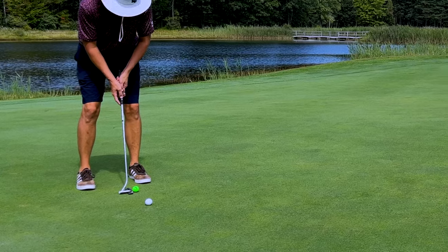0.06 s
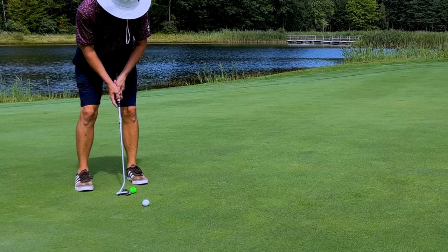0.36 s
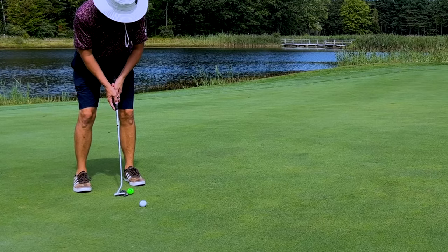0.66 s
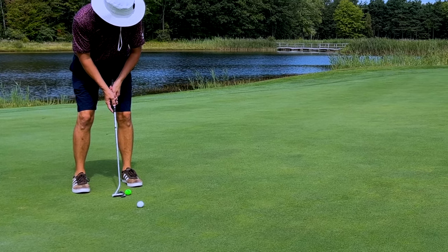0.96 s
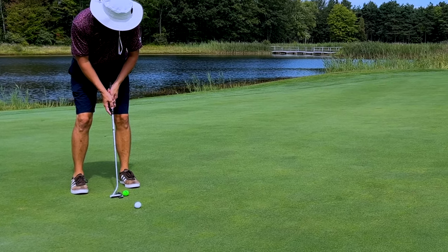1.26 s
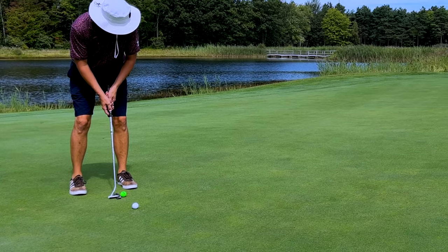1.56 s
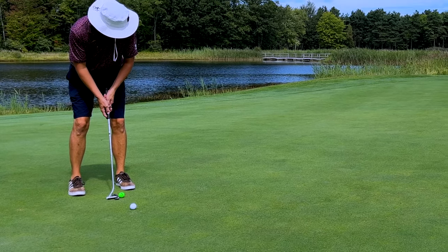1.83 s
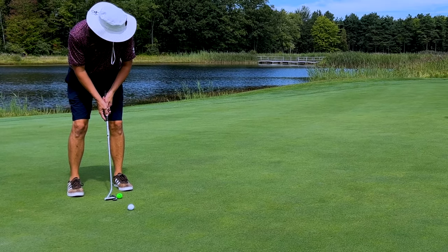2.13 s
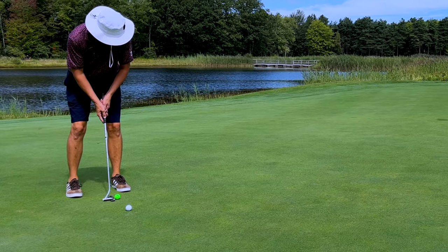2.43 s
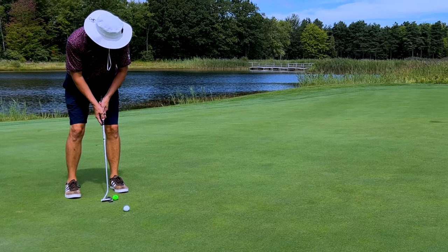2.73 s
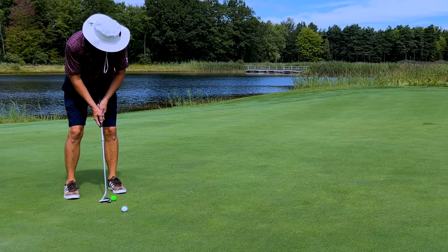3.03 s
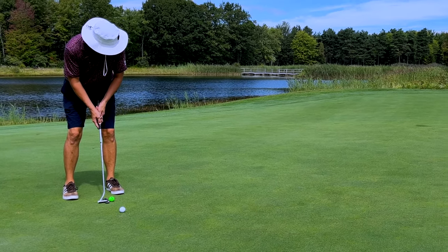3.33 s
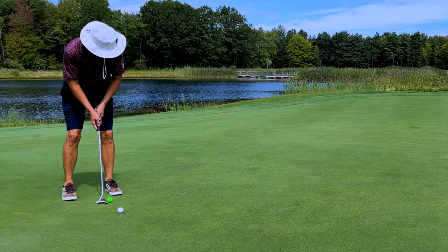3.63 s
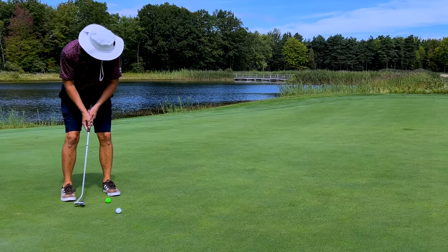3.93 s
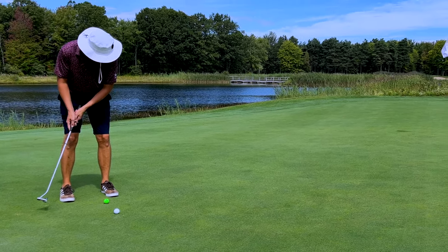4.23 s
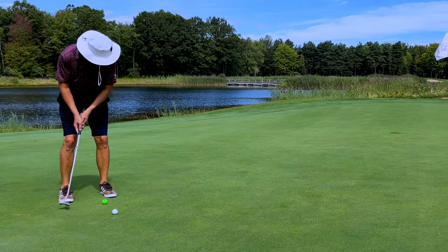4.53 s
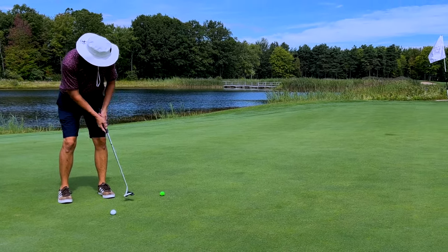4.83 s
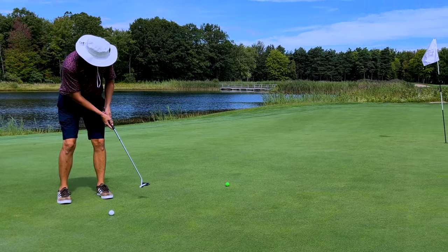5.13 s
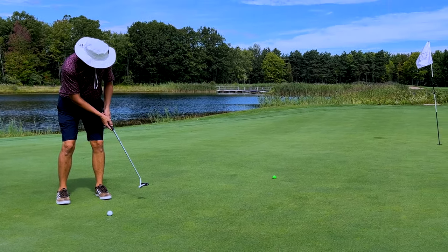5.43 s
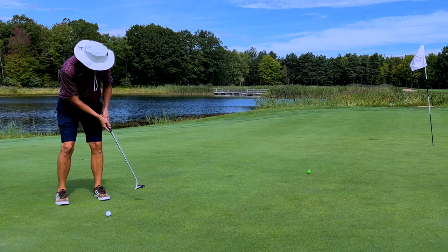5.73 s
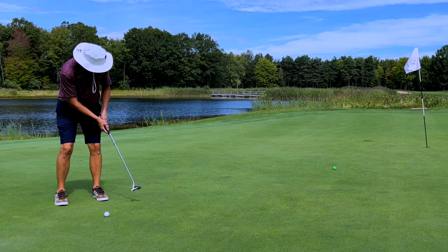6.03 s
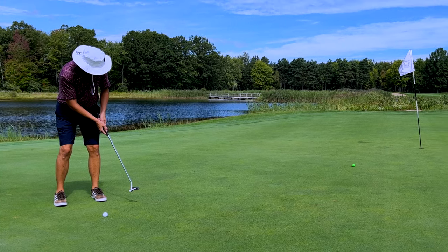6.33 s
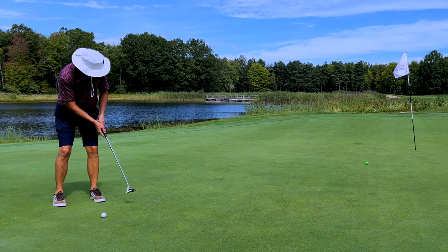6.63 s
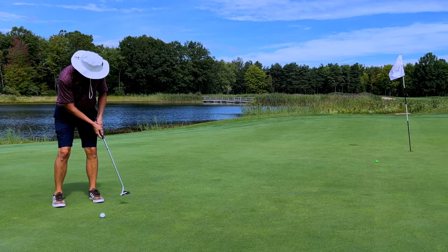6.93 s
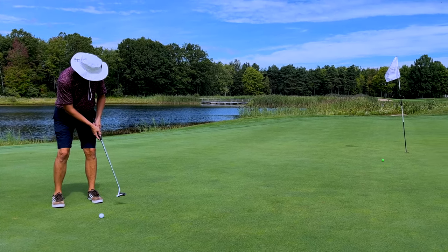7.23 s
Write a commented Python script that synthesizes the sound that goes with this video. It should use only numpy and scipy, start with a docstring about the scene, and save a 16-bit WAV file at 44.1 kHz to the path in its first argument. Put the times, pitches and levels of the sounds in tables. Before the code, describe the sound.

A steady low rumble lies under the whole scene on an outdoor golf green, with a light rustle of leaves and a faint high hiss of meadow insects. Crickets chirp in quick triple pulses about every 0.4 seconds, growing louder between 5 and 6.5 seconds. A cicada holds a thin, high buzz that slowly swells, then stops at about 6 seconds with one short extra buzz. A distant mower hums throughout, a little stronger from 3.5 to 6.5 seconds. A woodpecker drums a short, hollow roll at around 1.8 seconds, and a far bird repeats one soft note six times between 2.8 and 4 seconds. At 4.7 seconds the putter strikes the ball with a single sharp click and a very brief metallic ring, slightly to the left. A second, somewhat louder woodpecker roll follows from 4.9 to 5.3 seconds. The background continues to the end, just past 7 seconds.

```python
"""Putt on a summer green

One sharp click: the putter rings head and ball. A cicada buzzes its tymbals and stops; crickets
scrape their wings in threes over a chorus of meadow insects. A woodpecker drums twice on a hollow
trunk and a bird calls softly in the woods. A far mower hums over leaves and a low rumble.
Two closely spaced microphone ports pick it all up."""
import sys
import numpy as np
from scipy import signal
from scipy.fft import rfft, irfft
from scipy.io import wavfile

SR = 44100
rng = np.random.default_rng(int(sys.argv[2]) if len(sys.argv) > 2 else 0)


def materialize(psi):
    """Save the field psi as 16-bit PCM at rate SR to the path in sys.argv[1].

    A 1-D psi becomes a single channel; in a 2-D psi each row is a channel.
    """
    bounded = np.clip(np.atleast_2d(psi).T, -1, 1)
    quanta = np.round(bounded * 32767).astype(np.int16)
    wavfile.write(sys.argv[1], SR, quanta)


N = 320414
T = np.arange(N) / SR
FREQS = np.maximum(np.arange(N // 2 + 1) * SR / N, 1)
PUTT_S = 4.7017


def putt(level_db=-24.5, turf_ms=1.148, turf_db=-9, tick_ms=2.51, tick_db=-13):
    """A very short contact rings head and ball; the turf reflects it and a fainter tick follows."""
    # head and ball modes: (frequency [Hz], relative level [dB], t60 [s], left-right [dB])
    modes = [(463, 1.5, 0.011, 4), (930, -4.5, 0.009, 15), (1350, 1, 0.011, 10), (1770, -7, .008, 3),
             (2450, -7, 0.0031, 4), (3410, -7, 0.011, 11), (3760, -20.5, 0.13, 13), (4870, -10, 0.009, 11),
             (9300, -22, 0.0056, 5), (11000, -25, .005, -5), (13100, -23, .005, -3)]
    clicks = np.zeros(N)
    for delay_ms, db in [(0, 0), (turf_ms, turf_db), (tick_ms, tick_db)]:
        clicks[round((PUTT_S + delay_ms / 1000) * SR)] += from_db(db)
    rings = np.zeros((2, N))
    for k, (hz, db, t60_s, left_db) in enumerate(modes):
        mode = (-1) ** k * from_db(db) * ring(clicks, hz, t60_s)
        rings += pan(ports(mode, lag_ms=.278), left_db)
    return from_db(level_db) * (rings + from_db(-12) * scatter(rings, t60_s=.1))


def high_hiss(centre_hz=12200, width_hz=1300, level_db=-72, t60_s=.3):
    """A faint, very high hiss dies away just after the click."""
    since_s = np.maximum(T - PUTT_S, 0)
    decay = from_db(level_db - 60 * since_s / t60_s) * (since_s > 0)
    return ports(decay * noise(bell(FREQS - centre_hz, width_hz)), lag_ms=.16)


def crickets(top_hz=5470, min_fall_hz=640, syllable_s=.026, lead_s=.012, gain_db=4.5, grit_db=2.2):
    """Each wing closure is a gritty syllable that holds its pitch, then drops as the scraper slows."""
    # chirps, near and far: (time of first syllable [s], relative level [dB])
    chirps = [(.153, -63), (.26, -65), (.555, -62), (.694, -60.5), (1.09, -59.5), (1.131, -63), (1.51, -64),
              (1.537, -58), (1.913, -60.5), (2.352, -62), (2.742, -63.5), (3.158, -62), (3.566, -64),
              (4.004, -62.5), (4.394, -59), (4.812, -57), (5.265, -55), (5.674, -53), (6.096, -54.5),
              (6.513, -56)]
    # three wing closures per chirp: (delay [s], relative level [dB])
    syllables = [(0, -1), (.042, 0), (.087, 0.4)]
    out, u = np.zeros(N), np.linspace(0, 1, int(syllable_s * SR))
    swell = np.sin(np.pi * u ** 1.26)
    for s, db in chirps:
        for delay_s, syllable_db in syllables:
            hz = top_hz + rng.normal(0, 25) - min_fall_hz * rng.uniform(1, 1.4) * u ** 3
            gain = from_db(db + syllable_db + rng.normal(0, 1))
            start = int((s + delay_s - lead_s) * SR)
            out[start:start + len(u)] += gain * swell * np.sin(phase_of(hz))
    out *= from_db(gain_db + grit_db * drift(90))
    direct = pan(ports(out, lag_ms=.039), left_db=6.5)
    return direct + from_db(-9) * scatter(direct, t60_s=.36)


def cicada(width_hz=275, low_tone_hz=6170, end_s=6.03, release_db_per_s=299, last_buzz_s=6.135):
    """Two tymbals click in turn into the resonant abdomen; the song ends with one short extra buzz."""
    # song: (time [s], level [dB], abdomen resonance [Hz])
    song = [(0.05, -71.5, 6700), (0.3, -66.5, 6720), (0.7, -65.5, 6880), (1.1, -67.5, 6780),
            (1.55, -66.5, 6780), (1.95, -60.5, 6870), (2.45, -64.5, 6720), (2.7, -62, 6840),
            (3.4, -60, 6770), (4.0, -62, 6670), (4.5, -60, 6710), (5.0, -58.5, 6620), (5.2, -57, 6690),
            (5.45, -61, 6680), (5.75, -65, 6660), (5.98, -65, 6760)]
    # tymbal click rate, one hitch, slowing as the insect tires: (time [s], rate [Hz])
    tymbal_rate = [(1.6, 168.05), (2.15, 168.2), (2.19, 168.8), (2.6, 168), (3.4, 168.15), (5.55, 168),
                   (5.8, 167.6), (6.06, 166), (6.12, 163.8)]
    # second tymbal's lag behind the half cycle as the body flexes: (time [s], lag [s])
    tymbal_lag = [(2.1, 36e-6), (2.3, 48e-6), (3.0, 44e-6), (3.5, 35e-6), (4.0, 38e-6), (4.4, 48e-6),
                  (5.0, 48e-6), (5.2, 36e-6), (5.7, 37e-6), (5.95, 50e-6)]
    # thin tone below the resonance: (time [s], level [dB])
    low_tone = [(0.1, -82), (0.7, -73), (1.0, -75), (1.3, -65), (1.6, -69), (2.0, -78), (3.6, -72.5),
                (4.7, -73), (5.2, -69), (5.9, -68)]
    # weaker lines either side of the resonance: (frequency [Hz], level [dB])
    side_lines = [(5000, -88), (5370, -76), (5540, -70.5), (5720, -85.5), (5880, -78.5), (6040, -79.5),
                  (6210, -76.5), (6400, -82.5), (7200, -81), (7400, -67.5), (7560, -80), (7750, -82),
                  (8240, -87.5), (8800, -99), (9300, -90), (9750, -88.5), (10100, -105)]
    # phase between the ports: (frequency [Hz], left lead [rad])
    port_phase = [(5500, -0.5), (5800, -1.4), (6500, -0.6), (7000, -1.16), (7400, -2), (9700, -2)]
    song_db, resonance_hz = in_time(song)
    rate_hz, = in_time(tymbal_rate)
    lag_s, = in_time(tymbal_lag)
    low_tone_db, = in_time(low_tone)
    cycle = phase_of(rate_hz)
    spacing_rad = np.pi + 2 * np.pi * rate_hz * lag_s
    buzz = np.zeros((2, N))
    for k in range(30, 60):
        hz = k * rate_hz.mean()
        main = from_db(song_db) * resonance(hz - resonance_hz, width_hz)
        low = from_db(low_tone_db) * resonance(hz - low_tone_hz, width_hz=150)
        side = from_db(at_hz(side_lines, hz) + .35 * (song_db - song_db.mean()))
        height = np.sqrt(main ** 2 + low ** 2 + side ** 2)
        pair_gain = np.sqrt(2) * np.cos(k * spacing_rad / 2)  # uneven spacing lets in odd lines
        # moving air fades, shifts and quivers each line on its own
        gain = height * pair_gain * from_db(1.8 * drift(4))
        phase = k * (cycle - spacing_rad / 2) + .55 * drift(.89) + .35 * drift(25)
        buzz += gain * np.array([np.cos(phase), np.cos(phase - at_hz(port_phase, hz))])
    # no two clicks are alike: a faint rasp throbs with them
    rasp = noise(resonance(FREQS - resonance_hz.mean(), width_hz)) * (1 + .3 * np.cos(2 * cycle))
    buzz += from_db(song_db - 13) * ports(rasp, lag_ms=-.028)
    release = from_db(-release_db_per_s * np.maximum(T - end_s, 0))
    last_buzz = from_db(-5) * bell(T - last_buzz_s, .028)
    return pan((release + last_buzz) * buzz, left_db=-4)


def woodpecker(gain_db=-3, rise_s=.0095, pitch_spread=.04, spread_db=1.5):
    """Pecks on a hollow trunk; trees on the way round off each knock and shuffle its modes."""
    # two rolls that trail off: (time [s], relative level [dB], pitch of the spot struck [Hz])
    pecks = [(1.829, -37, 630), (1.88, -37, 660), (1.932, -38, 622), (1.979, -38, 618), (2.041, -38, 630),
             (2.081, -39, 660), (2.131, -38.5, 605), (2.187, -39, 623), (2.242, -41, 623),
             (2.297, -38, 625), (2.349, -42, 623), (4.881, -34, 770), (4.935, -33.5, 837),
             (4.988, -33, 808), (5.04, -33, 788), (5.093, -32, 765), (5.148, -32, 747), (5.201, -40, 736),
             (5.254, -40, 743), (5.308, -40.5, 722)]
    # trunk modes: (multiple of the pitch, relative level [dB])
    trunk = [(.4, -4.5), (0.82, -5), (0.91, -5), (1, 1.5), (1.09, -3), (1.21, -3.5)]
    out, t = np.zeros(N), T[:SR // 10]
    swell = (t / rise_s * np.exp(1 - t / rise_s)) ** 2
    knock_rms = np.sqrt(np.mean(swell ** 2) / 2)
    for s, db, hz in pecks:
        knock = np.zeros(len(t))
        for ratio, mode_db in trunk:
            mode_hz = ratio * hz * rng.normal(1, pitch_spread)
            gain = from_db(mode_db + rng.normal(0, spread_db))
            knock += gain * swell * np.sin(2 * np.pi * (mode_hz * t + rng.random()))
        start = int(s * SR)
        out[start:start + len(t)] += from_db(db + gain_db) * knock_rms * rms_one(knock)
    direct = pan(ports(out, lag_ms=-.39), left_db=-1.5)
    return direct + from_db(-12) * scatter(direct, t60_s=.7)


def far_crickets(count=70, level_db=-61, top_hz=5150, fall_hz=400):
    """Farther crickets add lone falling syllables at random, most of them faint."""
    out, u = np.zeros(N), np.linspace(0, 1, SR // 60)
    for when, pitch, distance in rng.random((count, 3)):
        hz = top_hz * (.95 + .1 * pitch) - fall_hz * u ** 2
        start = int(when * (N - len(u)))
        out[start:start + len(u)] += np.sin(np.pi * u) * np.sin(phase_of(hz)) / (1 + 2 * distance)
    return pan(ports(from_db(level_db) * out, lag_ms=.023), left_db=8.5)


def far_bird(note_hz=1750, width_hz=70, width_s=.04):
    """A bird deep in the woods repeats one soft note, blurred by the trees into a narrow band."""
    # notes: (time [s], level [dB])
    notes = [(2.8, -66), (3.0, -67), (3.23, -64), (3.44, -62), (3.68, -64), (3.94, -64)]
    swell = sum(from_db(db) * bell(T - s, width_s) for s, db in notes)
    return pan(swell * noise(bell(FREQS - note_hz, width_hz)), left_db=1)


def mower(firing_hz=107.5, sag_hz_per_s=.33, hum_gain_db=-.23, drone_gain_db=-2.5):
    """Firing hum and blade drone of a far engine, slowing under load and wavering with the air."""
    # engine and blade lines: (multiple of the firing rate, relative level [dB])
    hum_lines = [(1, 0), (4 / 3, -10), (8 / 5, -17.5), (2, -21)]
    drone_lines = [(2, -6), (8 / 3, -7), (3, -5), (7 / 2, -8), (4, -5.5), (13 / 3, -3.5), (14 / 3, -5.5),
                   (5, -10)]
    # their envelopes, the hum swelling as it nears: (time [s], relative level [dB])
    hum_level = [(0, -41.5), (2.8, -41), (3.5, -35), (5.3, -36), (6.4, -35), (6.8, -41), (7.2, -38.5)]
    drone_level = [(0.2, -51.5), (0.6, -51.5), (1.8, -55), (2.35, -44.5), (3.3, -44.5), (3.59, -53),
                   (4.38, -48.5), (5.6, -49), (6.1, -55.5), (7.0, -54)]
    cycle = phase_of(firing_hz - sag_hz_per_s * T)

    def partials(lines, level, fade_db, fade_hz, quiver_rad):
        """Engine lines, each fading and quivering on its own."""
        out = np.zeros(N)
        for k, db in lines:
            gain = from_db(db + fade_db * drift(fade_hz))
            wander = .31 * k * drift(1.64) + quiver_rad * drift(fade_hz)
            out += gain * np.sin(k * cycle + wander + rng.uniform(0, 2 * np.pi))
        return np.sqrt(2) * from_db(in_time(level)[0]) * out

    hum = partials(hum_lines, hum_level, fade_db=.5, fade_hz=2.6, quiver_rad=.13)
    drone = partials(drone_lines, drone_level, fade_db=3.5, fade_hz=14.4, quiver_rad=.46)
    return (from_db(hum_gain_db) * ports(hum, lag_ms=.074)
            + from_db(drone_gain_db) * ports(drone, lag_ms=.58))


def rumble(level_db=-34.5):
    """Low, distant rumble from all around."""
    # shared and opposed spectra: (frequency [Hz], relative density [dB])
    mid = [(15, -48), (25, -24.5), (32, -15.5), (40, -14.5), (50, 2), (65, 1.5), (82, -0.5), (110, -5),
           (135, -6), (175, -12), (230, -14.5), (330, -19.5), (700, -33.5), (1500, -110)]
    side = [(15, -44), (30, -11.5), (55, 0.5), (100, 3.5), (190, 0), (310, -5.5), (400, -6), (480, -5),
            (700, -21.5), (1500, -110)]
    return from_db(level_db) * diffuse(mid, side, side_db=-14.5)


def leaves(gain_db=1.23):
    """Leaves rustle in a light breeze."""
    # breeze: (time [s], relative level [dB])
    breeze = [(0.1, -56), (0.99, -56), (2.39, -57.5), (7.2, -58)]
    # shared and opposed spectra: (frequency [Hz], relative density [dB])
    mid = [(300, -71), (450, -26), (600, 0.5), (950, 6), (1200, 1), (1600, -4), (1750, 0.5), (2000, -3),
           (2300, -6), (2900, -10), (3600, -14), (5000, -64), (8000, -86)]
    side = [(300, -72.5), (450, -30), (580, 2), (700, 2.5), (900, 8), (1200, 1.5), (1650, -1),
            (1780, -16.5), (2300, -17), (2900, -17.5), (3600, -19), (8000, -96.5)]
    return from_db(in_time(breeze)[0] + gain_db) * diffuse(mid, side, side_db=6.5)


def meadow_insects(level_db=-61, fade_db_per_s=.5):
    """Massed insects merge into a slowly fading hiss."""
    # shared and opposed spectra: (frequency [Hz], relative density [dB])
    mid = [(1500, -85.5), (2600, -15.5), (3500, 2.5), (4400, 9), (4900, 11), (5300, 6), (5650, -1.5),
           (6300, -3), (6900, -0.5), (7300, 3.5), (8100, 3.5), (8500, -7.5), (10000, -41), (13500, -33.5)]
    side = [(1500, -79.5), (2600, -16.5), (3700, -11.5), (4900, 11), (5300, -7.5), (5650, 7.5),
            (6300, -13.5), (6900, 0.5), (7300, 9), (7800, 9.5), (8300, 15.5), (8700, 13.5), (9200, 1),
            (10500, -46)]
    return from_db(level_db - fade_db_per_s * T) * diffuse(mid, side, side_db=3)


def tree_crickets():
    """Far-off trills, heard as steady narrow bands."""
    # trills: (centre [Hz], width [Hz], level [dB])
    trills = [(3040, 55, -78.5), (3520, 48, -76), (4010, 74, -77)]
    chorus = sum(from_db(db) * noise(1 / (1 + (2 * (FREQS - hz) / width_hz) ** 2))
                 for hz, width_hz, db in trills)
    return pan(chorus, left_db=8)


def diffuse(mid, side, side_db):
    """Sound from all around: a part shared by the ports and a part opposed, coloured by each port."""
    # port sensitivity: (frequency [Hz], left-right [dB])
    balance = [(100, -1.6), (500, 0), (1600, -2.5), (2200, 6.5), (3300, 7.5), (4400, 4), (5200, 5.5),
               (5800, 1), (8500, 0)]
    shared = noise(from_db(at_hz(mid, FREQS)))
    opposed = from_db(side_db) * noise(from_db(at_hz(side, FREQS))) * [[1], [-1]]
    return irfft(pan(rfft(shared + opposed), at_hz(balance, FREQS)), N)


def scatter(x, t60_s):
    """Dense reflections from trees and turf, of unit energy."""
    tail = rng.standard_normal((2, SR)) * from_db(-60 * T[:SR] / t60_s)
    tail /= np.sqrt(np.sum(tail ** 2, axis=1, keepdims=True))
    return signal.fftconvolve(x, tail, axes=1)[:, :N]


def ports(x, lag_ms):
    """Left and right port; the right lags by lag_ms."""
    return np.array([x, np.interp(T - lag_ms / 1000, T, x)])


def pan(x, left_db):
    """Level difference between the ports."""
    return x * from_db(np.array([[.5], [-.5]]) * left_db)


def ring(clicks, hz, t60_s):
    """A unit click sets a sine of height 1 ringing."""
    r, w = from_db(-60 / (t60_s * SR)), 2 * np.pi * hz / SR
    return signal.lfilter([0, np.sin(w)], [1, -2 * r * np.cos(w), r * r], clicks + 1e-18)


def resonance(off_hz, width_hz):
    """Gain of a resonance at a distance from its centre."""
    return 1 / (1 + (off_hz / width_hz) ** 2 / 2) ** 2


def bell(offset, width):
    """Gaussian, 1/e at one width."""
    return np.exp(-(offset / width) ** 2)


def noise(gains):
    """Unit-rms noise shaped by a gain per frequency."""
    return rms_one(irfft(rfft(rng.standard_normal(N)) * gains, N))


def drift(rate_hz):
    """Random wander of unit rms."""
    hop, settle = 100, 2000
    r = np.exp(-2 * np.pi * rate_hz * hop / SR)
    white = rng.standard_normal(N // hop + settle + 2)
    slow = signal.lfilter([1], [1, -2 * r, r * r], white)[settle:]
    return np.interp(np.arange(N) / hop, np.arange(len(slow)), rms_one(slow))


def phase_of(hz):
    """Running phase [rad]."""
    return 2 * np.pi * np.cumsum(hz) / SR


def in_time(rows):
    """Each column of a curve, at every sample."""
    s, *columns = np.transpose(rows)
    return [np.interp(T, s, c) for c in columns]


def at_hz(points, hz):
    """Read a spectrum on a log-frequency axis."""
    f, value = np.transpose(points)
    return np.interp(np.log(hz), np.log(f), value)


def from_db(db):
    """Decibels to gain."""
    return 10 ** (np.asarray(db) / 20)


def rms_one(x):
    """Scale to unit rms."""
    return x / np.sqrt(np.mean(x ** 2) + 1e-20)


def scene():
    """Everything on and around the green."""
    strike = putt() + high_hiss()
    animals = crickets() + far_crickets() + cicada() + woodpecker() + far_bird()
    background = mower() + rumble() + leaves() + meadow_insects() + tree_crickets()
    return strike + animals + background


def record(dry, stop_hz=16280, stop_db=70):
    """Steep low-pass."""
    return signal.sosfilt(signal.cheby2(12, stop_db, stop_hz, fs=SR, output="sos"), dry)


dry = scene()
out = record(dry)
materialize(out)
```